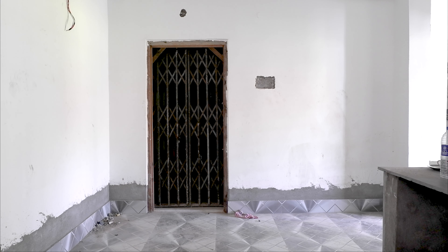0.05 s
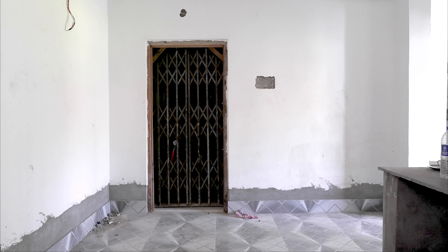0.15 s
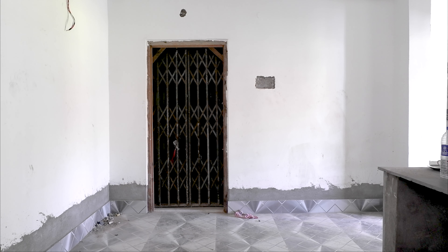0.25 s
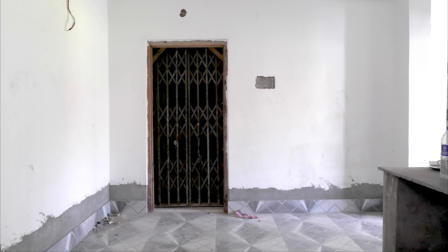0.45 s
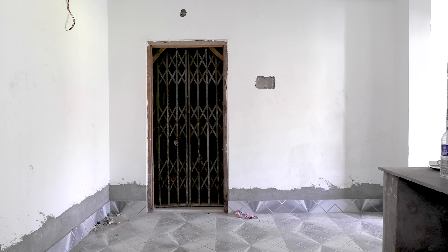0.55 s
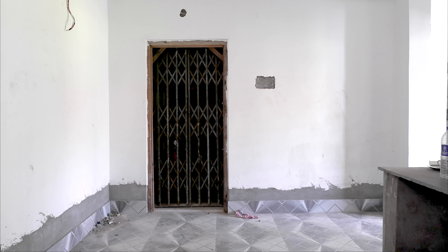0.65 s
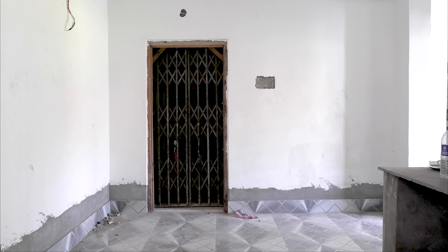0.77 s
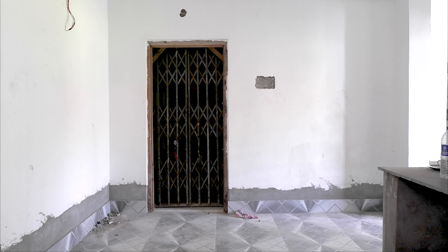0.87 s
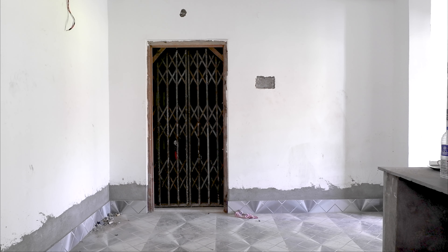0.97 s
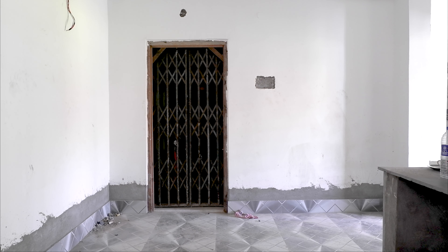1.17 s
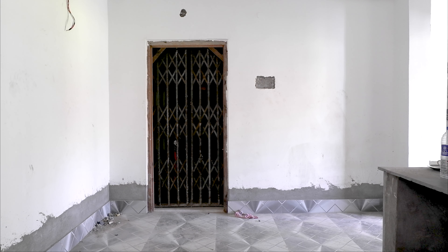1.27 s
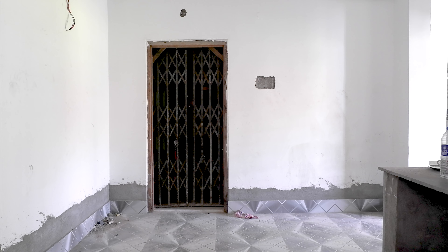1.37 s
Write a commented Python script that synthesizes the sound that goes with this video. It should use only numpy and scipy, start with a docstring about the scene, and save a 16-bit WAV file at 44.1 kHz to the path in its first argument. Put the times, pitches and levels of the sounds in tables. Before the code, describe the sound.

Steel bars of a folding gate knock hard together, followed by an uneven metallic slide, small high tings, near silence over soft outdoor hum, then a light scrape, picked up by a phone across an echoing empty room.

```python
"""Folding lattice gate in a bare room

A folding steel lattice gate moves in the doorway of a hard room, a few metres from a phone.
A sharp clack and small knocks are noise bursts coloured by steel that excite the modes of the bars.
A gritty slide is a dense train of random clicks, and thin tings are sums of decaying sines.
The room rings on by convolution with decaying noise, over a quiet hum of filtered outdoor noise."""
import sys
import numpy as np
from scipy import signal
from scipy.fft import rfft, irfft, next_fast_len
from scipy.io import wavfile
from scipy.ndimage import uniform_filter1d

SR = 44100
rng = np.random.default_rng(int(sys.argv[2]) if len(sys.argv) > 2 else 0)


def to_wav(sig):
    """Store sig (one row per channel, or 1-D mono) as 16-bit WAV at the path in sys.argv[1].

    Samples outside -1..1 are clipped; the rate is SR.
    """
    pcm = np.clip(np.atleast_2d(sig), -1, 1) * 32767
    pcm = np.round(pcm).astype(np.int16)
    wavfile.write(sys.argv[1], SR, pcm.T)  # frames by channels


N = 63945  # length [samples]

BANDS_HZ = 500 * 2 ** (np.arange(31) / 6)  # centres of the sixth-octave slices
RISE_S = .002  # time constant of the onset of cracks and modes

# Knocks of bar on bar: (time [s], level before a common 6 dB lift [dB],
# slope below the pivot [dB per octave], slope above the pivot [dB per octave])
KNOCK_EVENTS = [(.2035, -20.5, 5, -9), (0.211, -20.5, 5, -0.5), (0.2151, -15.5, 1.5, 5.5),
                (0.2197, -22.5, 2, 8), (.225, -24.5, 1.5, 2), (.239, -30.5, -4, -36), (0.284, -54, 6, 19),
                (0.4, -41, 7, 16), (0.683, -47.5, -6.5, 1)]
PIVOT_HZ, CRACK_DECAY_S = 4300., 0.0048  # the decay is a time constant


def knocks():
    """Impact excitation: each knock is a short noise burst with the spectrum of struck steel."""
    out = np.zeros(N)
    t = np.arange(2048) / SR
    lead = 256  # silence ahead of the crack, room for the filter's spread
    envelope = np.exp(-t / CRACK_DECAY_S) * (1 - np.exp(-t / RISE_S))
    for start, db, bass, treble in KNOCK_EVENTS:
        crack = np.pad(rng.standard_normal(2048) * envelope, (lead, 0))
        coloured = sum(undb(steel_db(f, PIVOT_HZ, bass, treble)) * band(crack, f) for f in BANDS_HZ)
        add(out, start - lead / SR, undb(db + 6) * coloured)
    return out


# Modes of the lattice bars: (frequency [Hz], relative level [dB], 60 dB decay time [s])
BAR_MODES = [(640, -6, .3), (730, -7, .3), (900, -8, .2), (2530, -4, .04), (2760, -5, .04), (2980, -3, .04),
             (3170, -3, .04), (3640, -2, .04), (4030, -2, .04), (4310, -3, .04), (4590, -3, .04),
             (5200, -2, .04), (7833, -3, .03), (10600, -6, .03), (12600, -6, .03)]
RING_DB = -13  # ringing relative to the knocks, for a response of unit energy


def lattice(struck):
    """Modal resonance: the knocks are convolved with the decaying modes of the bars."""
    bars = ring(BAR_MODES, rng.random(len(BAR_MODES)))
    bars = bars / np.sqrt(np.sum(bars ** 2))
    return struck + undb(RING_DB) * signal.fftconvolve(struck, bars)[:N]


# Course of the slide: (time [s], level before a common 6 dB lift [dB], pivot [Hz],
# slope below the pivot [dB per octave], slope above it [dB per octave], lift of the track's low body [dB])
SLIDE_COURSE = [(0, -42.5, 4200, 5, -8, 0), (0.049, -54, 4260, 6, -4.5, 6), (.08, -53, 4270, 2.5, -6, 2),
                (.1, -45, 4270, 0, -5, -2), (0.171, -64.5, 4330, -6, -1.5, -11),
                (0.202, -44.5, 4400, -1, 9, 0.5), (.25, -40, 4300, -7.5, 4.5, -1.5),
                (0.299, -36.5, 4270, 2, 3, 5.5), (.34, -43, 4250, -1.5, -1, -7),
                (.38, -42, 4360, 10, -1, -2), (.42, -41, 4340, 0.5, 1, -4.5), (.5, -51, 4340, -0.5, 7, -1),
                (.55, -46, 4300, 3.5, -0.5, 3.5), (.575, -48.5, 4000, -4, 8.5, 7),
                (.62, -46, 4030, -2.5, 8, 6), (.65, -64, 4200, -6, 2, 7), (.675, -56.5, 4220, 5, 10, -19),
                (.7, -49.5, 4300, 4.5, 6.5, -34), (.74, -62.5, 4600, 3, -6, -5),
                (.8, -96, 4920, 7, -7, -10), (.85, -100, 5200, 0.5, -4, -1),
                (1.271, -79, 5200, 58, -49.5, -6), (1.322, -59, 5200, 44, -37, -7),
                (1.35, -54.5, 4580, 33, -10.5, -10), (1.39, -52, 3900, 33, -7.5, -10.5),
                (1.42, -50.5, 3900, 29, -8, -10), (1.45, -63, 3930, 20, 8.5, -30)]
GRIT_PER_S, GRIT_SPREAD_DB = 7000, 1.5  # mean click rate; mean of the exponential spread of click level
TRACK_LOW_HZ, TRACK_HIGH_HZ = 930, 1780  # span of the track's low body


def slide():
    """Friction as random impacts: dense uneven clicks whose level and colour follow a set course."""
    t = np.arange(N) / SR
    course = np.array(SLIDE_COURSE, float).T
    db, pivot, bass, treble, low_lift = (np.interp(t, course[0], column) for column in course[1:])
    hit, size, sign = rng.random((3, N))
    clicks = hit < GRIT_PER_S / SR
    heights = undb(-GRIT_SPREAD_DB * np.log(1 - size))
    grit = unit(clicks * heights * np.sign(sign - .5))
    out = np.zeros(N)
    for f in BANDS_HZ:
        gain_db = steel_db(f, pivot, bass, treble) + low_lift * track_share(f)
        out += undb(gain_db) * band(grit, f)
    return undb(db + 6) * out


def track_share(hz):
    """Band-limited body resonance: 1 within the track's low body, fading to 0 at its edges."""
    upper_edge = np.clip(6 * np.log2(TRACK_HIGH_HZ / hz), 0, 1)
    lower_edge = np.clip(1 + 4 * np.log2(hz / TRACK_LOW_HZ), 0, 1)
    return upper_edge * lower_edge


# Colour of struck and rubbed steel: (frequency [Hz], relative spectral level [dB])
STEEL_COLOUR = [(290, -62), (500, -25), (696, -18.5), (914, -15.5), (982, -13), (1430, -10), (1960, 1.5),
                (2890, 7), (3330, 3.5), (4440, 6), (5830, -1.5), (8000, -4), (8980, -10), (15500, -31)]
BASS_OCTAVES, TREBLE_OCTAVES = 1.8, 1.4  # reach of the slopes on either side of the pivot


def steel_db(hz, pivot, bass, treble):
    """Spectral tilt: the colour of steel, sloped separately below and above a pivot."""
    octaves = np.log2(hz / pivot)
    below = bass * np.clip(octaves, -BASS_OCTAVES, 0)  # a positive slope thins the bass
    above = treble * np.clip(octaves, 0, TREBLE_OCTAVES)
    return at(STEEL_COLOUR, hz) + below + above


# Tings of a small loose part: (time [s], level [dB])
TING_EVENTS = [(.002, -65), (0.399, -49), (0.679, -44.5), (0.85, -68.5)]
# Modes of that part: (frequency [Hz], relative level [dB], 60 dB decay time [s])
PART_MODES = [(3391, -2, .09), (4750, -11, .15), (8250, -15, .6), (8275, -6, .12), (9500, -12, .12),
              (10060, -8, .2), (10115, -4, .15), (10150, 0, .2), (10210, -9, .3), (10440, -12, .15),
              (10750, -11, .12), (11300, -10, .12), (11900, -11, .12)]


def tings():
    """Free vibration: a small part is flicked and sings in its own high modes."""
    out = np.zeros(N)
    for start, db in TING_EVENTS:
        add(out, start, undb(db) * ring(PART_MODES, rng.random(len(PART_MODES))))
    return out


def ring(modes, phases):
    """Modal superposition: a sum of exponentially decaying sines with a soft onset."""
    t = np.arange(SR // 2) / SR
    total = np.zeros(len(t))
    for (hz, db, t60), phase in zip(modes, phases):  # phase in cycles
        total += undb(db - 60 * t / t60) * np.sin(2 * np.pi * (hz * t + phase))
    return (1 - np.exp(-t / RISE_S)) * total


SPOTS, SPOT_S = 6, .04  # places on the gate that sound in turn, time from one to the next [s]


def room(source):
    """Position-dependent reverberation: contact wanders over the gate, each place with its own echoes."""
    lead = 4096  # mirrored opening [samples]: the slide was under way before the start
    source = np.concatenate([source[:lead][::-1], source])
    place = np.arange(len(source)) / SR / SPOT_S
    out = np.zeros(N)
    for spot in range(SPOTS):
        distance = (place - spot + SPOTS / 2) % SPOTS - SPOTS / 2
        share = np.cos(np.pi / 2 * np.clip(distance, -1, 1))  # equal-power crossfade
        out += signal.fftconvolve(source * share, tail())[lead:lead + N]
    return out


# Decay of the room: (frequency [Hz], 60 dB decay time [s])
ROOM_DECAY = [(700, 0.56), (1200, .16), (1900, 0.28), (2800, 0.28), (4800, 0.47), (9000, 0.16),
              (15000, 0.36)]
ROOM_BUILD_S, FIRST_ECHO_S = 0.01, .004  # build-up time constant, delay of the first echo


def tail():
    """Diffuse decay: noise that builds up fast, then fades at a rate set by frequency."""
    t = np.arange(SR // 2) / SR
    noise = rng.standard_normal(len(t))
    echoes = np.zeros(len(t))
    for f in BANDS_HZ:
        t60 = at(ROOM_DECAY, f)
        echoes += band(noise, f) * undb(-60 * t / t60) / np.sqrt(t60)  # evens out the slices' energy
    echoes = echoes * (1 - np.exp(-t / ROOM_BUILD_S))
    return np.pad(echoes / np.sqrt(np.sum(echoes ** 2)), (int(FIRST_ECHO_S * SR), 0))


# Colour of the broad outdoor noise: (frequency [Hz], relative spectral level [dB])
OUTSIDE_COLOUR = [(13, -71), (22, -33), (102, -11.5), (142, -13.5), (187, -3.5), (298, -15), (352, -9.5),
                  (576, -14.5), (846, -17), (1460, -20), (1980, -25), (2680, -25), (15500, -38.5)]
OUTSIDE_DB = -63  # RMS level of the broad noise
# Room resonances stirred by outdoor noise: (frequency [Hz], width [Hz], RMS level [dB])
HUM_RESONANCES = [(106, 42, -81.5), (191, 1.6, -67), (199, 12, -74.5), (224.5, 10, -81), (293.8, 24, -73.5),
                  (390, 12, -83.5), (602, 23, -82.5)]


def outside():
    """Resonance driven by noise: soft broad noise, and narrow low bands that waver within it."""
    broad = colour(rng.standard_normal(N), lambda f: undb(at(OUTSIDE_COLOUR, f)))
    out = undb(OUTSIDE_DB) * unit(broad)
    for hz, width, db in HUM_RESONANCES:
        hum = colour(rng.standard_normal(N), lambda f: 1 / (1 + (2 * (f - hz) / width) ** 2))
        out = out + undb(db) * unit(hum)
    return out


def undb(db):
    """Level law: decibels to amplitude ratio."""
    return 10 ** (np.asarray(db) / 20)


def unit(x):
    """Power normalisation: scale to an RMS of 1."""
    return x / np.sqrt(np.mean(x ** 2))


def at(table, hz):
    """Logarithmic pitch scale: a (frequency, value) table read straight on a log-frequency axis."""
    t = np.array(table, float)
    return np.interp(np.log(np.maximum(hz, 1)), np.log(t[:, 0]), t[:, 1])


def colour(x, gain):
    """Linear filtering: multiply the spectrum by a gain that depends on frequency."""
    n = next_fast_len(len(x) + 4096)
    hz = np.arange(n // 2 + 1) * SR / n
    return irfft(rfft(x, n) * gain(hz), n)[:len(x)]


def band(x, hz):
    """Filter bank: one triangular sixth-octave slice; neighbouring slices add up to the whole."""
    return colour(x, lambda f: np.clip(1 - 6 * np.abs(np.log2(np.maximum(f, 1) / hz)), 0, 1))


def add(out, start, x):
    """Superposition: add a sound into out from a start time in seconds."""
    i = int(start * SR)
    out[i:i + len(x)] += x[:N - i]


# Gain of the faint side layer that follows the gate: (frequency [Hz], gain [dB])
SIDE_COLOUR = [(400, -31.5), (1000, -24), (2000, -23.5), (4000, -19), (8000, -12), (15000, -5)]
# Gain of the outdoor noise at the sides: (frequency [Hz], gain [dB])
OUTDOOR_SIDE_COLOUR = [(30, -27), (60, -26), (150, -34.5), (300, -23), (1000, -14.5), (4000, -5.5),
                       (15000, 2.5)]
ROOM_DB = -4  # echoes in the mid signal
SIDE_HALVED_DB, SIDE_AVERAGE_S = -34, .02  # side level at which its gain is halved, averaging time


def scene():
    """Mid-side stereo: gate, echoes and outdoors in the middle, a faint decorrelated layer and noise aside."""
    gate = lattice(knocks()) + slide() + tings()
    mid = gate + undb(ROOM_DB) * room(gate) + outside()
    layer = room(gate)  # new random draws decorrelate it from the middle
    loudness = np.sqrt(np.abs(uniform_filter1d(layer ** 2, int(SIDE_AVERAGE_S * SR))))
    layer = layer / (1 + (loudness / undb(SIDE_HALVED_DB)) ** 2.84)  # turned down where it is loud
    side = colour(layer, lambda f: undb(at(SIDE_COLOUR, f)))
    side = side + colour(outside(), lambda f: undb(at(OUTDOOR_SIDE_COLOUR, f)))
    return np.array([mid + side, mid - side])


TOP_HZ = 15640


def record(dry):
    """Band limitation: the phone cuts the top with a steep elliptic low-pass."""
    low_pass = signal.ellip(12, .2, 80, TOP_HZ, fs=SR, output="sos")  # .2 dB ripple, 80 dB rejection
    return signal.sosfilt(low_pass, dry)


dry = scene()
out = record(dry)
to_wav(out)
```